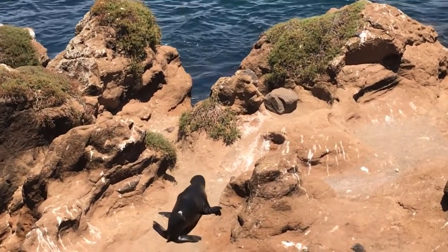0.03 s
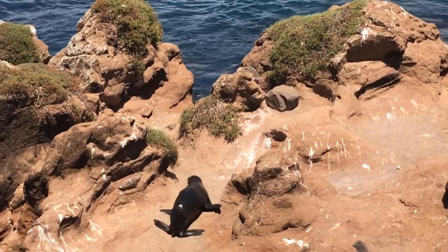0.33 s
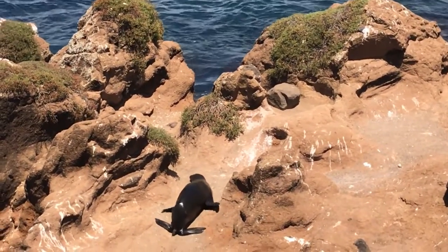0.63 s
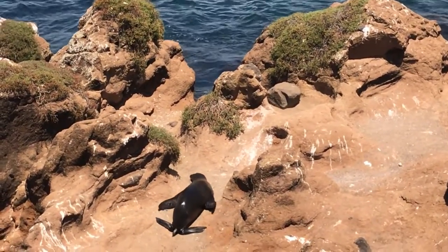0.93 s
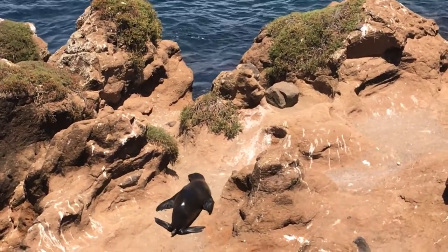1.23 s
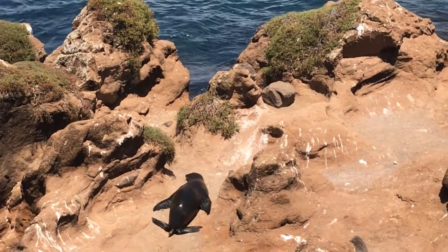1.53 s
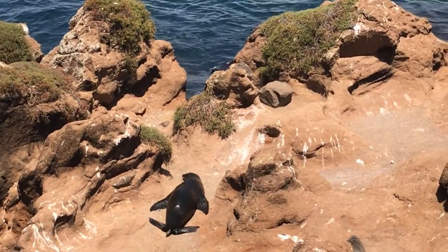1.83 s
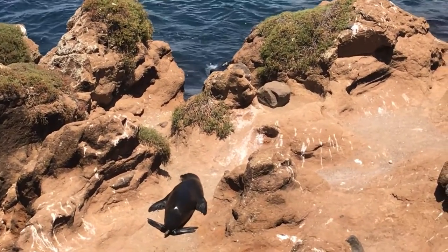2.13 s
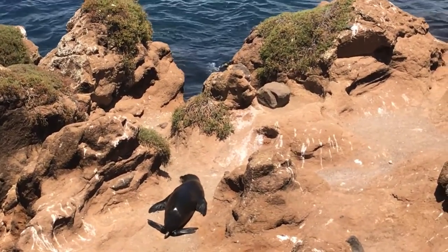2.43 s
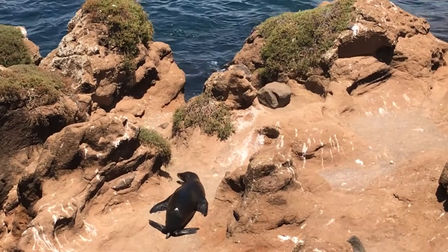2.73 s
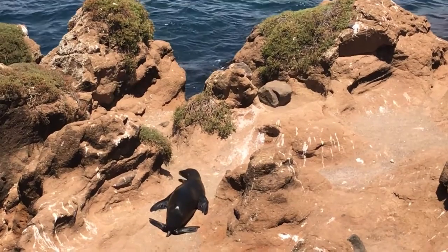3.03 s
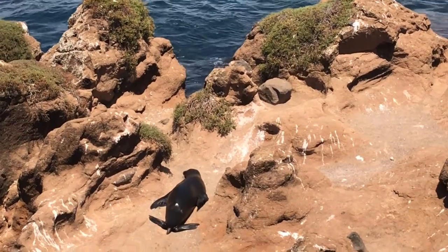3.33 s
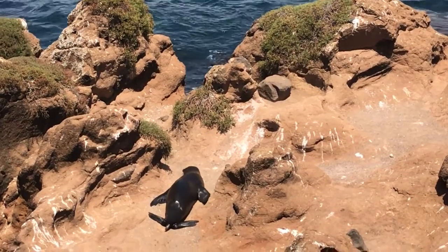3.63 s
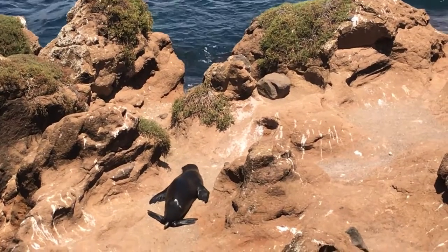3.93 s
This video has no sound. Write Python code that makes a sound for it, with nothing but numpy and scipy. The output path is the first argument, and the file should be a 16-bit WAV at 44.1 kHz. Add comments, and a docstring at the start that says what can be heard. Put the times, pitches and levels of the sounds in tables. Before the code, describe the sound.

Gusty wind buffets the microphone throughout, with a low rumble, thumps and crackling flutter. It surges around 0.3 and 1 second, with short puffs breaking through the lulls near 0.7 and 1.5 seconds. The sea hisses faintly underneath, and small waves wash softly over rocks with a little spray at about 0.8 and 1.8 seconds. From 2 seconds the wind blows more evenly until the end at 4 seconds.

```python
"""Gusty wind buffets a microphone on a rocky shore. From the start, large slow eddies rumble and the sea
hisses steadily below. Smaller eddies thump, flutter and crackle in ragged bursts, brighter as the wind
stiffens, and short puffs break through the lulls. A small wave washes over the rocks at 0.8 s with
grainy spray, a faint tick follows, and a second wave breaks at 1.8 s; then the wind blows more evenly."""
import sys
import numpy as np
from scipy import signal
from scipy.fft import rfft, irfft
from scipy.io import wavfile
from scipy.ndimage import uniform_filter1d

SR = 44100
rng = np.random.default_rng(int(sys.argv[2]) if len(sys.argv) > 2 else 0)


def store_wav(level_fs):
    """Save 16-bit WAV to argv[1]."""
    pcm = np.round(np.clip(np.atleast_2d(level_fs), -1, 1) * 32767)
    wavfile.write(sys.argv[1], SR, pcm.T.astype(np.int16))


N = 176400
T = np.arange(N) / SR
HZ = np.maximum(np.arange(N // 2 + 1) * SR / N, 1)

# wind at the microphone: (time [s], relative flutter level [dB], buffeting level [dB])
GUSTS = [(0, -53, -18.5), (.05, -34, -28.5), (.14, -29.5, -27), (.21, -43, -29.5), (.25, -35.5, -28),
         (.28, -17.5, -22.5), (.36, -21, -16.5), (.43, -25.5, -20), (.49, -19, -20), (.51, -39, -26),
         (.57, -51, -27), (.66, -50, -31.5), (.72, -44, -20.5), (.81, -45, -38), (.92, -39, -23.5),
         (.95, -22, -20), (1.0, -15.5, -25), (1.06, -19.5, -18), (1.17, -23, -20), (1.2, -35.5, -23),
         (1.25, -21.5, -15), (1.32, -28.5, -25.5), (1.37, -25.5, -25.5), (1.42, -42, -34), (1.47, -49, -52),
         (1.5, -42, -24.5), (1.55, -43, -34.5), (1.64, -45, -23), (1.7, -28, -21), (1.85, -25.5, -23),
         (1.96, -23.5, -18.5), (2.03, -28, -16.5), (2.16, -33.5, -19), (2.3, -29.5, -22.5),
         (2.45, -23, -22.5), (2.57, -23, -24.5), (2.68, -20.5, -24), (2.85, -22, -25.5), (3.05, -27, -19.5),
         (3.15, -22.5, -21.5), (3.34, -26, -22), (3.45, -17, -20.5), (3.6, -23, -20), (3.78, -23.5, -18),
         (3.88, -33, -17), (4, -23.5, -24)]
# brief knots of turbulence: (time [s], relative level [dB], half-width [s], upper edge [Hz])
PUFFS = [(0.034, -19.5, 0.014, 1100), (.102, -15.5, 0.0025, 1300), (0.284, -21.5, .01, 1700),
         (0.303, -18, 0.0038, 1480), (0.53, -19.5, 0.017, 1310), (.603, -16.5, 0.011, 1110),
         (0.631, -21, 0.014, 930), (.68, -15.5, 0.019, 1200), (0.77, -17.5, 0.0077, 870),
         (.853, -15.5, 0.0027, 570), (0.882, -20, 0.006, 694), (.95, -7, 0.004, 1020),
         (0.983, -15, 0.012, 1580), (0.999, -6.5, 0.0051, 1390), (1.217, -14, 0.0038, 1670),
         (1.307, -18.5, 0.013, 1670), (1.324, -12, 0.014, 544), (1.508, -16, 0.014, 543),
         (1.59, -16.5, 0.016, 610), (1.671, -14.5, 0.011, 553), (1.766, -13.5, 0.0074, 1150),
         (1.88, -14, 0.0057, 1110), (1.976, -8, .014, 1030), (2.137, -10.5, 0.005, 607),
         (2.184, -9, 0.0067, 460), (2.4, -13, 0.032, 403), (2.505, -15.5, 0.0075, 1620),
         (2.663, -18.5, .004, 1610), (2.707, -17.5, 0.003, 1600), (2.774, -10, 0.023, 447),
         (2.831, -13, .004, 1280), (2.842, -14, 0.0057, 1380), (2.962, -22.5, 0.0043, 1930),
         (3.095, -18, 0.0024, 1670), (3.58, -18.5, 0.013, 900), (3.752, -20, 0.013, 724)]


def from_db(db):
    """The decibel scale: amplitude grows tenfold for every 20 dB."""
    return 10 ** (np.asarray(db) / 20)


def rms_one(x):
    """Normalisation: a signal divided by its RMS value has unit power."""
    return x / np.sqrt(np.mean(x ** 2) + 1e-20)


def in_time(rows):
    """Linear interpolation gives each column of a curve at every sample."""
    times, *columns = np.transpose(rows)
    return [np.interp(T, times, column) for column in columns]


def coloured(x, spectrum):
    """Spectral shaping: a white signal takes on the spectrum of its filter, here at unit power."""
    hz, db = np.transpose(spectrum)
    gain = from_db(np.interp(np.log(HZ), np.log(hz), db))
    gain /= np.sqrt(1 + (HZ / hz[-1] / 2) ** 4)
    return rms_one(irfft(rfft(x) * gain, N))


def drift(corner_hz):
    """Random modulation: low-passed noise swings smoothly, softly limited to +-2."""
    slow = irfft(rfft(rng.standard_normal(N)) / (1 + (HZ / corner_hz) ** 2), N)
    return 2 * np.tanh(rms_one(slow) / 2)


def evened(x, window_s):
    """Division by the running RMS value holds the slow level at 1 and keeps the quick swings."""
    power = uniform_filter1d(x ** 2, int(window_s * SR))
    power = uniform_filter1d(power, int(window_s * SR / 2))
    return x / np.sqrt(np.abs(power) + 1e-9)


def clumped_noise(swing_db, corner_hz):
    """Intermittency: noise with a randomly modulated level comes in clumps."""
    return rng.standard_normal(N) * from_db(swing_db * drift(corner_hz))


def wind():
    """Turbulent pressure: large eddies rumble, smaller ones buffet, still smaller ones flutter."""
    rumble_levels = [(0.0, -31), (0.02, -14), (0.15, -27), (0.33, -16.5), (0.38, -31), (0.49, -15.5),
                     (0.6, -34.5), (0.69, -16), (0.73, -39), (0.78, -20), (0.86, -30), (0.95, -17),
                     (1.35, -21), (1.43, -35), (1.49, -18.5), (1.6, -25.5), (1.73, -24), (1.8, -24),
                     (1.83, -10.5), (1.88, -51), (1.93, -15.5), (2.39, -25), (2.55, -20.5), (2.58, -29),
                     (2.64, -18), (2.67, -22), (3.02, -19), (3.24, -27.5), (3.31, -15), (3.35, -31),
                     (3.43, -20), (4.0, -23.5)]  # large eddies: (time [s], relative level [dB])
    # spectra of the three sizes of eddy: (frequency [Hz], relative density [dB])
    rumble_spectrum = [(18, -42), (30, -19), (42, -6), (60, 2.5), (85, -0.5), (115, 0), (160, -16),
                       (300, -43)]
    buffet_spectrum = [(60, -25), (100, -11.5), (135, 2.5), (200, 1), (300, -3.5), (400, -11), (600, -29.5),
                       (1200, -96)]
    flutter_spectrum = [(200, -10), (330, -0.5), (430, 1), (650, 1.5), (1000, -5.5), (1300, -16.5),
                        (1600, -25), (2000, -36), (2800, -42), (5000, -79)]
    flutter_db, buffet_db = in_time(GUSTS)
    rumble_db, = in_time(rumble_levels)
    flow = clumped_noise(swing_db=4.5, corner_hz=170)  # one clump for each passing eddy
    surge_db = 3 * drift(corner_hz=16.5)
    rumble = evened(coloured(rng.standard_normal(N), rumble_spectrum), window_s=0.12)
    buffet = evened(coloured(flow, buffet_spectrum), window_s=0.048)
    flutter = evened(coloured(flow, flutter_spectrum), window_s=0.062)
    # stronger flow sheds smaller eddies, so the flutter brightens
    treble_hz, treble_db_per_db = 1100, 0.24
    treble = irfft(rfft(flutter) / (1 + (treble_hz / HZ) ** 4), N)
    strength_db = flutter_db - flutter_db.mean() + surge_db
    flutter += treble * (from_db(treble_db_per_db * strength_db) - 1)
    return (from_db(rumble_db + 0.5) * rumble
            + from_db(buffet_db) * buffet
            + from_db(flutter_db + surge_db - 4.18) * flutter)


def sea_hiss():
    """Broadband noise from the open sea forms a nearly steady floor."""
    levels = [(0, -44.5), (.6, -45.5), (1.25, -47.5), (2.2, -43), (2.75, -43), (4, -44.5)]  # open sea: (time [s], level [dB])
    spectrum = [(100, 13), (500, 0.5), (1200, 1.5), (2300, -3), (3200, -6.5), (4400, -10), (6500, -12.5),
                (9300, -14.5), (13000, -18.5), (15500, -20)]  # hiss: (frequency [Hz], relative density [dB])
    sea_db, = in_time(levels)
    waver_db = 0.45 * drift(corner_hz=12)
    return from_db(sea_db + waver_db) * coloured(rng.standard_normal(N), spectrum)


def crackle():
    """Shot noise: the smallest eddies snap at random instants, as hard as the wind blows."""
    spectrum = [(200, -3), (500, 6), (900, 3), (1300, -4.5), (1650, -11.5), (2100, -29), (3000, -37),
                (5000, -65)]  # one snap: (frequency [Hz], relative density [dB])
    snaps_per_s, spread_db = 46, 3.5
    flutter_db, _ = in_time(GUSTS)
    onsets = rng.random(N) < snaps_per_s / SR
    sizes = from_db(spread_db * np.clip(rng.standard_normal(N), -2, 2))
    signs = rng.choice([-1, 1], N)
    return from_db(flutter_db - 10) * coloured(onsets * sizes * signs, spectrum)


def puffs():
    """The eddy cascade: a puff holds many sizes of eddy; small ones are weaker, large ones last longer."""
    band_edges = [110, 230, 420, 700, 1050, 1500, 2100, 3000]  # one band for each size of eddy: (edge frequency [Hz])
    slope_db_per_octave, stretch_cycles = -3.5, 0.7
    edges = np.array(band_edges)
    centres = np.sqrt(edges[:-1] * edges[1:])
    filters = [signal.butter(3, pair, "band", fs=SR, output="sos") for pair in zip(edges, edges[1:])]
    bands = [signal.sosfilt(sos, rng.standard_normal(N)) for sos in filters]
    out = np.zeros(N)
    for time, db, half_width, top_hz in PUFFS:
        near = np.abs(T - time) < 0.08
        shares = from_db(slope_db_per_octave * np.log2(centres)) / np.sqrt(1 + (centres / top_hz) ** 10)
        shares /= np.linalg.norm(shares)
        for band, hz, share in zip(bands, centres, shares):
            stretched_s = np.hypot(half_width, stretch_cycles / hz)
            bell = np.exp(-2 * ((T[near] - time) / stretched_s) ** 2)
            burst = rms_one(bell * band[near]) * np.sqrt(np.mean(bell ** 2))
            out[near] += from_db(db - 2) * share * burst
    return out


def slaps():
    """A bipolar pressure pulse: the core of each puff pushes and pulls once on the diaphragm."""
    pitch_share = 0.52  # of the puff's upper edge
    signs = rng.choice([-1, 1], len(PUFFS))
    out = np.zeros(N)
    for (time, db, _, top_hz), sign in zip(PUFFS, signs):
        phase = np.clip(2 * np.pi * pitch_share * top_hz * (T - time), -10, 10)
        pulse = np.sin(phase) * np.exp(-0.5 * (phase / 2) ** 2)
        out += sign * from_db(db + 5.5) * pulse
    return out


def waves():
    """Amplitude modulation: grainy noise swells and drains as each wave washes over the rocks."""
    crests = [(.82, -46.5, 0.13, 0.14), (1.84, -45, 0.45, 0.08)]  # waves on the rocks: (time [s], level [dB], rise [s], fall [s])
    spectrum = [(300, -8), (1200, 9), (2400, 5.5), (3500, -0.5), (6000, -5), (9500, -7.5), (13000, -11),
                (15500, -18)]  # wash: (frequency [Hz], relative density [dB])
    envelope = np.zeros(N)
    for time, db, rise, fall in crests:
        width = np.where(T < time, rise, fall)
        envelope += from_db(db) * np.exp(-0.5 * ((T - time) / width) ** 2)
    return envelope * coloured(clumped_noise(swing_db=2.6, corner_hz=900), spectrum)


def spray_and_tick():
    """Gaussian envelopes shape noise into bursts of bright spray hiss and one faint, short tick."""
    # bursts of spray hiss, and the tick at 1.48 s: (time [s], level [dB], half-width [s])
    bursts = [(.63, -48.5, 0.013), (.85, -50, .014), (1.479, -50, .004), (1.83, -48, .045),
              (1.96, -46, 0.069), (2.04, -51.5, 0.065)]
    spectrum = [(1000, -16), (3000, 5), (4500, 7), (9500, 1), (15500, -4)]  # bright hiss: (frequency [Hz], relative density [dB])
    envelope = sum(from_db(db) * np.exp(-2 * ((T - time) / width) ** 2) for time, db, width in bursts)
    return envelope * coloured(clumped_noise(swing_db=3.1, corner_hz=900), spectrum)


def scene():
    """Superposition: the pressures of wind and shore add in one channel."""
    air = wind() + crackle() + puffs() + slaps()
    shore = sea_hiss() + waves() + spray_and_tick()
    return (air + shore)[None]


def record(dry):
    """Saturation rounds the largest peaks; the microphone port notches the treble, and the top is cut."""
    port_dips = [(4910, 130, -4), (7600, 580, -1.5), (10540, 580, -5)]  # notches of the port: (frequency [Hz], half-width [Hz], gain [dB])
    ceiling, cutoff_hz = 0.6, 15700
    rounded = dry / (1 + (dry / ceiling) ** 6) ** (1 / 6)
    port_db = sum(db * np.exp(-((HZ - hz) / width) ** 2) for hz, width, db in port_dips)
    low_pass = 1 / np.sqrt(1 + (HZ / cutoff_hz) ** 400)
    return irfft(rfft(rounded) * from_db(port_db) * low_pass, N)


dry = scene()
out = record(dry)
store_wav(out)
```